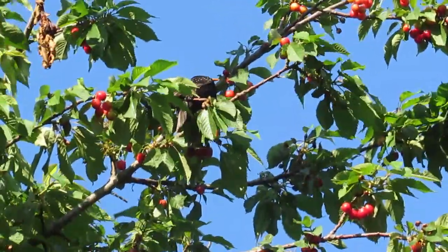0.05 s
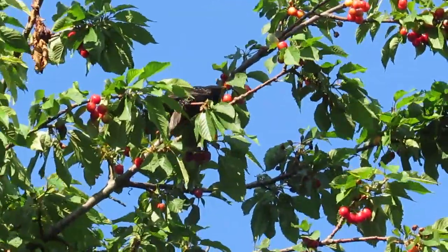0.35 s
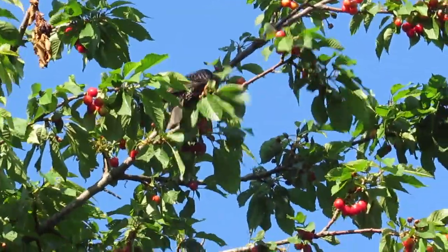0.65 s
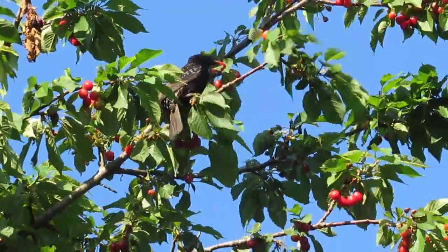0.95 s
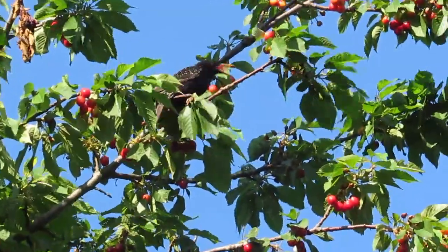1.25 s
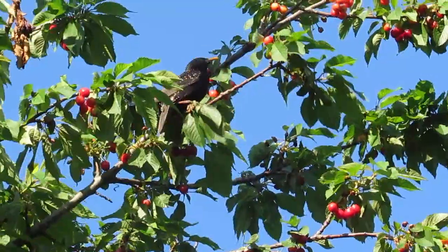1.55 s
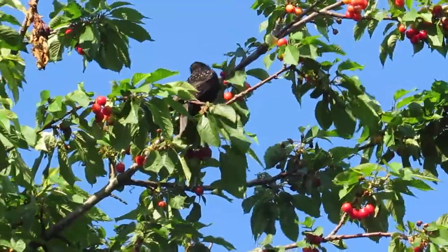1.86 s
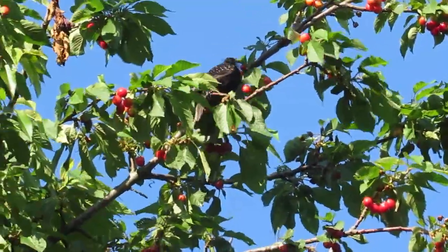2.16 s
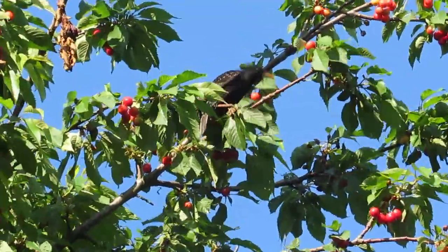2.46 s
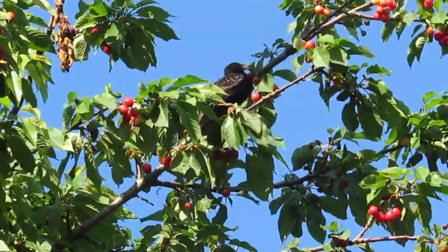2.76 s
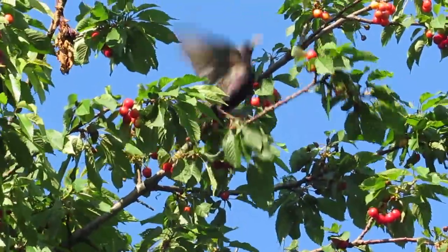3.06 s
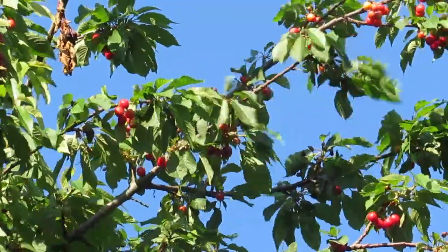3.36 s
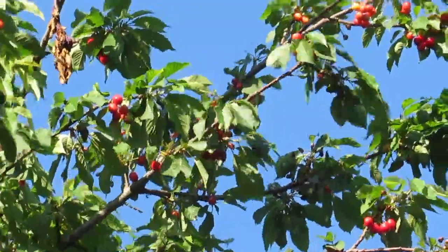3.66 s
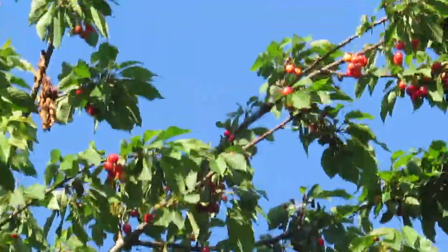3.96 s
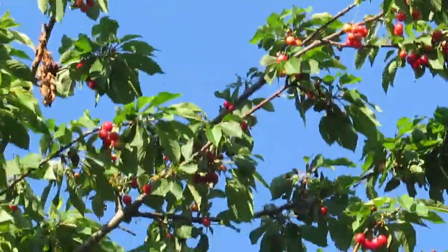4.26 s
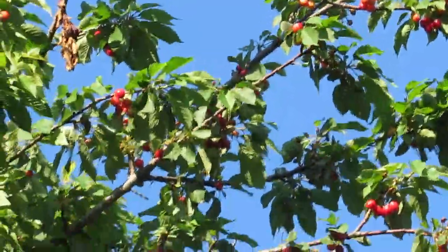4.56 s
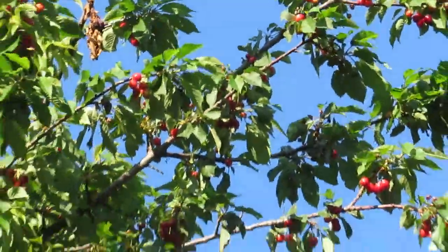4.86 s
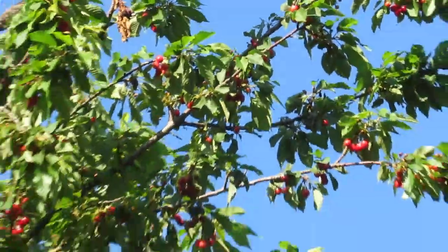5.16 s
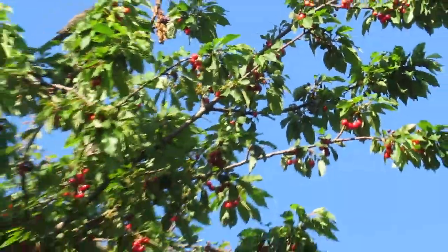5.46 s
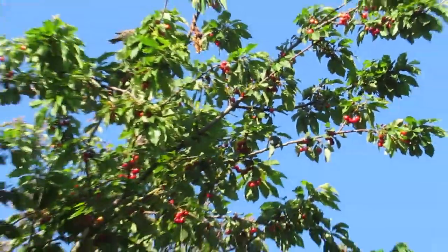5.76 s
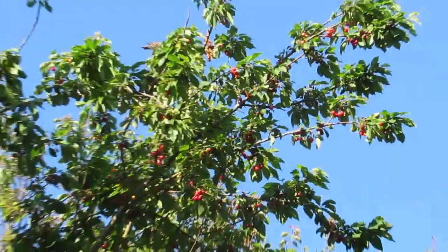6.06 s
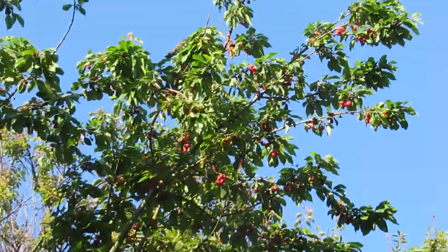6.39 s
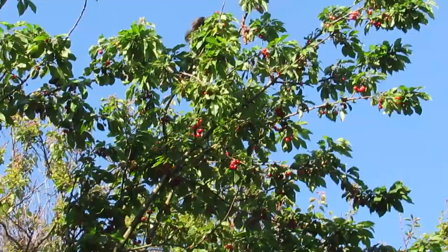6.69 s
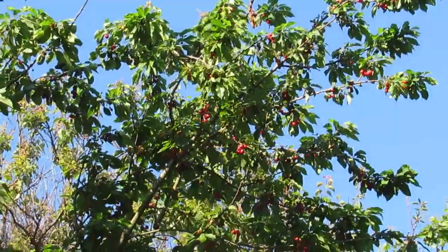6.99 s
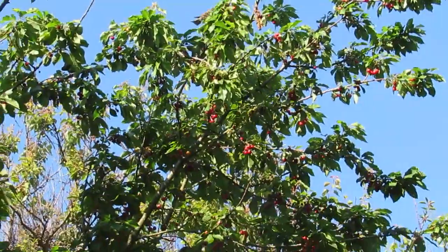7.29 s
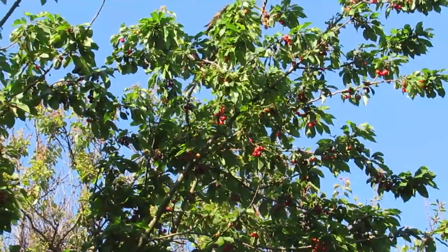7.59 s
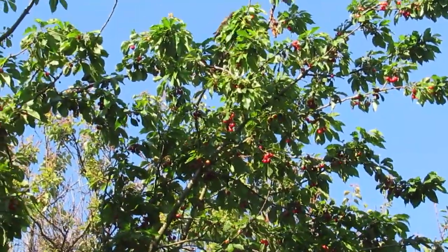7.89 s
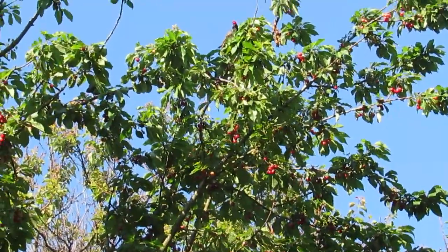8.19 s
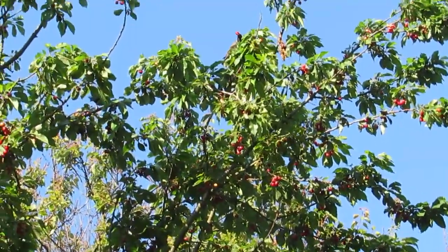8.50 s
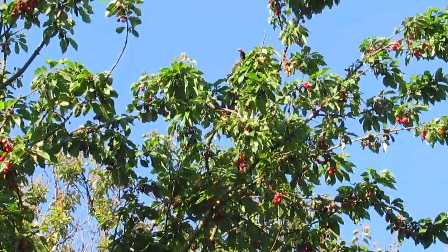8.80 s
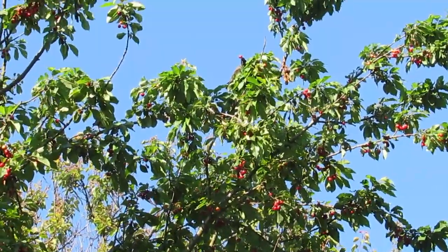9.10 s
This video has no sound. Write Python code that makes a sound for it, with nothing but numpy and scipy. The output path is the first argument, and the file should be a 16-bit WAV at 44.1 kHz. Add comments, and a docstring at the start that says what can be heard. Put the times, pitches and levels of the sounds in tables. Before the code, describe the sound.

High, raspy starling calls come one after another from a tree, slightly scattered by the leaves, with chirps, squeals and weaker calls from deeper in the branches. In the second half the birds shift to quieter, trembling churrs before a last harsh rasp. Far birds and a soft, wide hush of wind and traffic continue underneath, while a distant engine drones past and the leaves stir toward the end.

```python
"""In a cherry tree, starlings squabble: harsh falling rasps, quavering churrs, thin squeals, chirps. Each call
is a whistle from the syrinx, most shaken fast and unevenly, with overtones and hiss, scattered by the leaves.
Behind them lie far birds, a wash of wind and traffic with a brighter band that comes and goes, and an engine
that drones past in the distance. The level dips briefly midway."""
import sys
import numpy as np
from scipy import signal
from scipy.fft import rfft, irfft, next_fast_len
from scipy.io import wavfile
from scipy.ndimage import uniform_filter1d

SR = 44100
rng = np.random.default_rng(int(sys.argv[2]) if len(sys.argv) > 2 else 0)


def generate_wav(signal):
    """Clip the signal to [-1, 1] and save it as 16-bit WAV at the path in sys.argv[1]."""
    frames = np.transpose(np.atleast_2d(signal))
    scaled = np.clip(frames, -1, 1) * 32767
    pcm = np.round(scaled).astype(np.int16)
    wavfile.write(sys.argv[1], SR, pcm)


N = 411894
TIME = np.arange(N) / SR


# rasps: t/s, length/s, attack/s, start f/Hz, end f/Hz, glide exponent, level/dB,
# start treble/dB, end treble/dB (treble re level)
RASP_CALLS = [(-.1, 0.26, 0.0017, 3926, 3057, 0.89, -31.5, 1, -16),
              (1.34, .31, 0.12, 4400, 3144, 1.05, -30, -1, -14),
              (1.718, 0.14, 0.06, 3497, 3250, 1.14, -31, -12, -12),
              (2.165, .24, 0.066, 4970, 3323, 1.03, -36, -6, -14),
              (3.195, 0.27, .01, 4300, 3900, 0.92, -39.5, -12, -17),
              (3.215, .365, 0.12, 3662, 2990, .9, -33.5, -5.5, -22.5),
              (3.52, .23, 0.087, 3960, 3286, 1.05, -42.5, -3.5, -7),
              (4.26, 0.42, .16, 4276, 3446, 1, -44, -10, -26),
              (4.683, .14, .005, 4940, 3950, 1.3, -44, -1, 2),
              (4.795, 0.31, 0.053, 4600, 3020, 1.08, -44, 1, -3),
              (8.432, 0.36, 0.11, 3950, 2997, .7, -36, -9.5, -8)]

def rasps():
    """A fast shake of the syrinx turns a falling whistle harsh."""
    return harsh_calls(RASP_CALLS, release_s=0.077, sag_db=-3, hiss_db=2.5, fray_hz=900,
                       shake_hz=125.6, uneven=0.3, depth=0.0986, chaos=0.0504)


# churrs: columns as RASP_CALLS
CHURR_CALLS = [(5.115, 0.33, 0.1, 4850, 4440, 1, -47.5, 3, 3),
               (5.52, 0.38, .06, 4000, 2710, 1.5, -48, 9, -16.5),
               (6.465, 0.59, 0.075, 4460, 2834, 4, -47.5, 4, -9),
               (7.17, 0.51, 0.11, 4586, 3640, 1.2, -46, 5, -8.5),
               (7.83, .56, 0.084, 4690, 4130, 1.08, -43.5, -3, -5.5)]

def churrs():
    """A slower shake makes the falling whistle quaver."""
    return harsh_calls(CHURR_CALLS, release_s=0.19, sag_db=-5.5, hiss_db=3, fray_hz=902,
                       shake_hz=38.97, uneven=0.26, depth=0.085, chaos=0.08)


# whistle with side bands: f/pitch, level/dB
CORE_PARTIALS = [(.72, -12.5), (1, 2), (1.32, -11)]
# rough overtones: f/pitch, level/dB
ROUGH_PARTIALS = [(2, -0.5), (3, 1), (4, 2)]
# open-beak hiss spectrum: f/Hz, level/dB
BEAK_SPECTRUM = [(1700, -33), (2400, -8.5), (4000, -5), (5700, -2.5), (6900, 2), (8000, -1), (9200, -3),
                 (10500, -3.5), (11900, -6), (13000, -15.5), (15000, -19)]

def harsh_calls(rows, release_s, sag_db, hiss_db, fray_hz, **shake):
    """A shaken whistle sinks and sags as the push runs out; forcing it adds overtones and hiss."""
    out = np.zeros(N)
    for start_s, length_s, attack_s, start_hz, end_hz, bend, db, start_treble_db, end_treble_db in rows:
        t = span(start_s, start_s + length_s)
        push = np.clip(1 - (t - start_s) / length_s, 0, 1)
        hz = end_hz + (start_hz - end_hz) * push ** abs(bend)
        treble_db = end_treble_db + (start_treble_db - end_treble_db) * push
        phase, throb = syrinx(t, hz, flutter_db=2, crest_db=-0.44, **shake)
        core = unit(sum(undb(d) * np.sin(k * phase) for k, d in CORE_PARTIALS))
        core *= 1 - np.exp((push - 1) / 0.085)  # builds up behind the hiss
        # turbulence widens each overtone into a band
        overtones = unit(sum(undb(d) * np.sin(k * phase) * walk(t, fray_hz) for k, d in ROUGH_PARTIALS))
        hiss = undb(hiss_db) * rng.standard_normal(N // 8)[:len(t)]
        treble = unit(colour(overtones + hiss, BEAK_SPECTRUM))
        envelope = undb(db + sag_db * (1 - push)) * fade(t, attack_s, release_s)
        add(out, t, (core + undb(treble_db) * treble) * throb * envelope)
    return out


def syrinx(t, hz, shake_hz, uneven, depth, chaos, flutter_db, crest_db):
    """Phase and gain of a shaken whistle; depth (swing) and chaos (jitter) are shares of the pitch."""
    swing_hz = shake_hz * (1 + uneven * walk(t, shake_hz))
    swing = np.sin(phase_of(swing_hz))
    vibrato = depth * swing * (1 + uneven * walk(t, shake_hz))
    jitter = chaos * np.tanh(walk(t, 1500))
    throb = undb(flutter_db * walk(t, 350) + crest_db * swing)
    return phase_of(hz * (1 + vibrato + jitter)), unit(throb)


def simple_calls(rows, partials, sink_hz_per_s, rise, fall, hiss_db, **shake):
    """Shaken, steadily sinking whistles. Rise, fall: shares of the length. Partials: f/pitch, dB."""
    out = np.zeros(N)
    for start_s, length_s, mid_hz, db in rows:
        t = span(start_s, start_s + length_s)
        hz = mid_hz - sink_hz_per_s * (t - t.mean())
        phase, throb = syrinx(t, hz, flutter_db=2.5, **shake)
        voice = unit(sum(undb(d) * np.sin(k * phase) for k, d in partials))
        hiss = unit(colour(rng.standard_normal(N // 8)[:len(t)], BEAK_SPECTRUM))
        envelope = undb(db) * fade(t, rise * length_s, fall * length_s)
        add(out, t, (voice + undb(hiss_db) * hiss) * throb * envelope)
    return out


# second voice: t/s, length/s, mid f/Hz, level/dB
QUAVER_CALLS = [(5.14, .23, 4780, -49.5), (6.47, .16, 4580, -54), (7.18, 0.55, 4920, -53.5),
                (7.85, .52, 4860, -50.5), (8.53, .28, 4690, -42.5)]

def quavers():
    """The other side of the syrinx sings above the harsh calls."""
    return simple_calls(QUAVER_CALLS, [(1, -3), (1.5, -13.5)], sink_hz_per_s=400, rise=0.13, fall=0.48,
                        hiss_db=-4, shake_hz=39.3, uneven=0.0234, depth=0.111, chaos=0.0255, crest_db=0)


# squeals: t/s, length/s, mid f/Hz, level/dB
SQUEAL_CALLS = [(1.85, 0.23, 5500, -43.5), (3.08, .25, 5440, -44.5), (4.105, .27, 5560, -44.5),
                (6.045, .26, 5640, -50.5)]
# squeal partials: f/pitch, level/dB
SQUEAL_TONE = [(.43, -3.5), (.5, -3.5), (0.739, -2), (.9, 0), (1.04, 4), (1.52, -2.5), (2.14, -1.5)]

def squeals():
    """Thin, high whistles with inharmonic partials."""
    return simple_calls(SQUEAL_CALLS, SQUEAL_TONE, sink_hz_per_s=906, rise=0.22, fall=0.64,
                        hiss_db=-7.5, shake_hz=72.7, uneven=0.117, depth=0.057, chaos=0.0377, crest_db=1)


# chirps: t/s, later arch length/s, first top f/Hz, drop per arch/Hz, level/dB, lead-in level/dB
CHIRP_CALLS = [(2.213, .04, 5240, 152, -33.5, -47.5), (2.534, 0.043, 5120, 99, -34, -52),
               (4.684, 0.026, 5300, 99.5, -38, -55), (5.034, 0.041, 5220, 150, -42.5, -57),
               (5.94, 0.033, 5170, 483, -42, -50), (7.03, .029, 5240, 632, -37, -49.5)]

def chirps(first_arch_s=0.051, first_foot_hz=3470, arch_step_db=-4, foot_db=-10.5,
           lead_s=0.055, overlap_s=0.043, lead_hz=6600):
    """A short high rasp breaks into a hoarse whistle that arches three times, each lower and weaker."""
    out = np.zeros(N)
    for start_s, arch_s, top_hz, drop_hz, db, _ in CHIRP_CALLS:
        feet_s = np.append(start_s, start_s + first_arch_s + arch_s * np.arange(3))
        t = span(start_s, feet_s[-1])
        arch, progress = np.divmod(np.interp(t, feet_s, np.arange(4)), 1)
        height = np.sin(np.pi * progress ** 1.2) ** 0.8  # late, rounded top
        foot_hz = first_foot_hz - 0.4 * drop_hz * (arch + progress)
        hz = (top_hz - drop_hz * arch) * height + foot_hz * (1 - height)
        level_db = db + arch_step_db * arch + foot_db * (1 - height) + 4 * walk(t, 396)
        quiver = 1 + 0.0295 * walk(t, 1400)
        phase = phase_of(uniform_filter1d(hz, size=260) * quiver)
        voice = unit(np.sin(phase) + undb(-15) * np.sin(2 * phase) * walk(t, 900))
        add(out, t, voice * undb(level_db) * fade(t, 0.0037, 0.005))
    leads = [(start_s - lead_s, lead_s + overlap_s, lead_hz, db) for start_s, *_, db in CHIRP_CALLS]
    return out + simple_calls(leads, [(1, 0), (1.8, -5)], sink_hz_per_s=1720, rise=0.36, fall=0.42,
                              hiss_db=-1, shake_hz=157, uneven=0.287, depth=0.037, chaos=0.082,
                              crest_db=-2.5)


# calls deeper in the tree: t/s, length/s, mid f/Hz, level/dB
DEEP_CALLS = [(.11, 0.13, 3980, -41), (.25, 0.099, 3820, -40), (.405, 0.11, 3830, -42.5),
              (.53, 0.21, 3700, -54), (.77, 0.27, 3710, -52.5), (1.1, .18, 3445, -52.5),
              (1.61, 0.16, 3680, -42.5), (2.1, 0.14, 4130, -45.5), (2.66, 0.21, 3560, -53),
              (3.72, .12, 2900, -50), (3.92, .25, 3230, -56), (4.0, 0.17, 4500, -65),
              (5.37, 0.24, 4090, -55.5), (6.66, 0.47, 3980, -51), (7.58, 0.28, 3720, -54),
              (8.93, 0.32, 3080, -47)]

def deep_calls():
    """Birds deeper in the tree: shaken whistles with little treble."""
    partials = [(0.63, -7), (1, 3.5), (2, -34)]
    return simple_calls(DEEP_CALLS, partials, sink_hz_per_s=1700, rise=0.23, fall=0.48,
                        hiss_db=-13, shake_hz=109.9, uneven=0.3, depth=0.077, chaos=0.062, crest_db=0.5)


# throat and beak response: f/Hz, gain/dB
THROAT_RESPONSE = [(1800, -8.5), (2400, 3), (3400, 1), (5700, 0.5), (7000, 1.5), (12000, 1), (13500, 0.5)]

def throat(calls):
    """Throat and beak set the band in which the calls radiate."""
    return colour(calls, THROAT_RESPONSE)


# stereo width of birds: f/Hz, side re mid/dB
BIRD_SIDE = [(2500, -16.5), (4000, -13), (6000, -9.5), (9000, -4), (13000, -3)]

def foliage(calls, leaves_db=-4, leaves_t60_s=0.23, garden_db=-15, garden_t60_s=0.61, side_t60_s=0.26):
    """Leaves scatter the calls at once, the garden answers later; the treble spreads widest."""
    t = TIME[:SR]
    near, far, spread = rng.standard_normal((3, SR))
    leaves = undb(leaves_db) * unit(near * undb(-60 * t / leaves_t60_s))
    garden = undb(garden_db) * unit(far * undb(-60 * t / garden_t60_s) * np.minimum(t / 0.023, 1))
    sideways = unit(spread * undb(-60 * t / side_t60_s))
    mid = calls + signal.fftconvolve(calls, (leaves + garden) / np.sqrt(SR))[:N]
    side = colour(signal.fftconvolve(calls, sideways / np.sqrt(SR))[:N], BIRD_SIDE)
    return np.array([mid + side, mid - side])


# far flock: t/s, level/dB
FLOCK_LEVEL = [(0, -47.5), (1.1, -52.5), (2.2, -48), (2.9, -51), (3.9, -52.5), (4.55, -43), (4.9, -65.5),
               (6.4, -63.5), (8.6, -50.5), (9.34, -55)]
# its spectrum: f/Hz, level/dB
FLOCK_SPECTRUM = [(1300, -17), (2000, -6), (2600, -1), (4000, -0.5), (5200, -9), (8000, -16.5),
                  (14000, -31)]

def far_flock():
    """Distant birds blur into a wavering band of noise."""
    return wash(FLOCK_LEVEL, FLOCK_SPECTRUM, BIRD_SIDE, wander_db=1.9, wander_hz=9)


# far wind and traffic: t/s, level/dB
AIR_LEVEL = [(0.0, -53.5), (0.91, -51.5), (1.79, -54.5), (4.03, -51.5), (4.66, -51.5), (8.11, -45),
             (9.34, -46.5)]
# their spectrum: f/Hz, level/dB
AIR_SPECTRUM = [(20, -22), (50, 1.5), (100, 1.5), (200, 0), (400, -3), (490, 1), (600, -6.5), (690, -19.5),
                (810, -2.5), (1000, -1), (1540, -2.5), (1900, -19), (6000, -24), (15000, -32)]
# their stereo width: f/Hz, side re mid/dB
AIR_SIDE = [(30, 6), (125, 6.5), (250, 7), (500, 0.5), (1000, -5), (2000, -13), (8000, 0)]

def wind_and_traffic():
    """Far wind and traffic merge into a low, wide wash."""
    return wash(AIR_LEVEL, AIR_SPECTRUM, AIR_SIDE, wander_db=0.15, wander_hz=6)


# brighter band of far wind and traffic: t/s, level/dB
BRIGHT_AIR_LEVEL = [(0, -98), (4.4, -53), (4.9, -78), (6.5, -74), (7.8, -50), (9.34, -51.5)]
# its spectrum: f/Hz, level/dB
BRIGHT_AIR_SPECTRUM = [(150, -10), (700, -1.5), (2050, 3), (3000, -6), (12000, -54)]

def bright_air():
    """A brighter band of far wind and traffic swells and fades."""
    return wash(BRIGHT_AIR_LEVEL, BRIGHT_AIR_SPECTRUM, AIR_SIDE, wander_db=0.8, wander_hz=8)


# engine pass: t/s, firing f/Hz, level/dB
ENGINE_PASS = [(0, 56.5, -74), (4.8, 59.8, -62), (5.7, 62, -53), (6.05, 60.8, -65), (6.5, 58.96, -47.5),
               (7.5, 57.15, -49), (8.2, 56, -43), (8.8, 54.8, -49), (9.34, 54.3, -62)]
# engine harmonics: order, level/dB
ENGINE_HARMONICS = [(1, 0.5), (2, -7), (3, -11)]

def engine(left_db=-5):
    """A far engine swells, then sinks in pitch as it passes on the right."""
    firing_hz, db = read(ENGINE_PASS)
    phase = phase_of(firing_hz * (1 + 0.0113 * walk(TIME, 9)))
    drone = sum(undb(d + 2 * walk(TIME, 6.4)) * np.sin(k * phase) for k, d in ENGINE_HARMONICS)
    return np.outer([undb(left_db), 1], drone * undb(db))


def wash(levels, spectrum, width, wander_db, wander_hz):
    """Stereo noise band on a wandering level curve."""
    db = read(levels)[0] + wander_db * walk(TIME, wander_hz)
    mid, side = colour(rng.standard_normal((2, N)), spectrum)
    side = colour(side, width)
    return np.array([mid + side, mid - side]) / np.std(mid) * undb(db)


def colour(x, points):
    """Filter by points of f/Hz, gain/dB."""
    hz, db = np.transpose(points)
    size = next_fast_len(x.shape[-1])
    bins_hz = np.maximum(np.fft.rfftfreq(size, 1 / SR), 1)
    gain = undb(np.interp(np.log(bins_hz), np.log(hz), db))
    return irfft(rfft(x, size) * gain, size)[..., :x.shape[-1]]


def undb(db):
    """Decibels to gain."""
    return 10 ** (np.asarray(db) / 20)


def unit(x):
    """Scale to rms 1."""
    return x / np.sqrt(np.mean(x ** 2))


def phase_of(hz):
    """Running phase/rad."""
    return 2 * np.pi * np.cumsum(hz) / SR


def read(table):
    """Columns of a time curve at every sample."""
    times_s, *columns = np.transpose(table)
    return [np.interp(TIME, times_s, column) for column in columns]


def walk(t, rate_hz):
    """Random wander, spread near 1."""
    return np.interp((t - t[0]) * rate_hz, np.arange(8192), rng.standard_normal(8192))


def span(start_s, end_s):
    """Sample times of a call."""
    return TIME[max(int(start_s * SR), 0):int(end_s * SR)]


def fade(t, rise_s, fall_s):
    """Quarter-sine attack and release."""
    ramp = np.minimum((t - t[0]) / rise_s, (t[-1] - t) / fall_s)
    return np.sin(np.pi / 2 * np.clip(ramp, 0, 1))


def add(track, t, sound):
    """Mix a sound in at its times."""
    first = int(round(t[0] * SR))
    track[first:first + len(t)] += sound


def scene():
    """Birds in the tree over the distant background."""
    calls = rasps() + churrs() + quavers() + squeals() + deep_calls() + chirps()
    birds = foliage(throat(calls))
    air = (wind_and_traffic() + bright_air()) * undb([[-0.7], [0.7]])  # slightly right
    return birds + far_flock() + air + engine()


def record(dry, dip_start_s=4.622, dip_end_s=4.69, dip_db=-14.0, cutoff_hz=15050):
    """The level dips briefly midway; the top is cut steeply."""
    in_dip = (TIME > dip_start_s) & (TIME < dip_end_s)
    gain_db = uniform_filter1d(np.where(in_dip, dip_db, 0), size=180)
    lowpass = signal.ellip(10, 0.2, 70, cutoff_hz, fs=SR, output="sos")
    return signal.sosfilt(lowpass, dry * undb(gain_db))


dry = scene()
out = record(dry)
generate_wav(out)
```